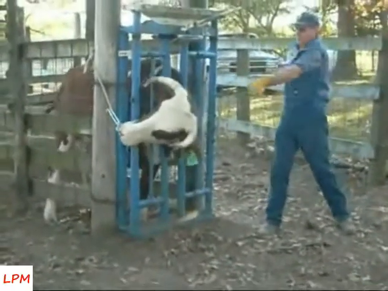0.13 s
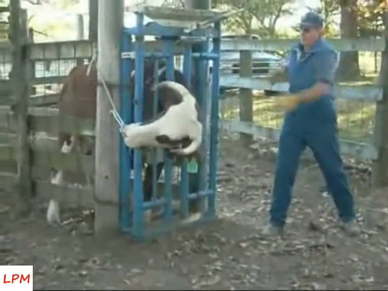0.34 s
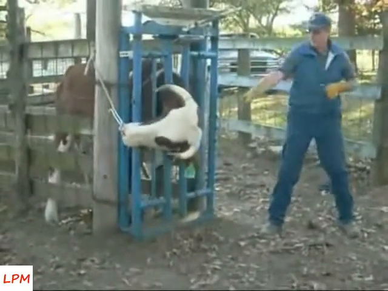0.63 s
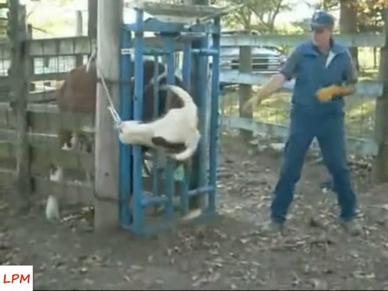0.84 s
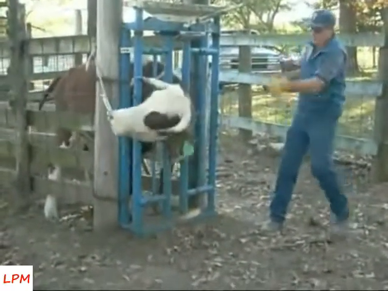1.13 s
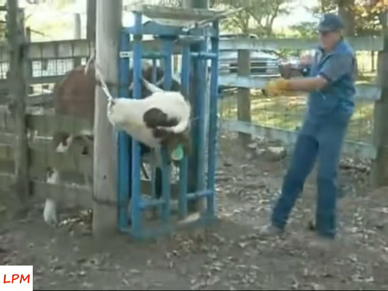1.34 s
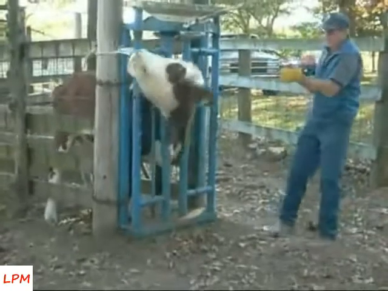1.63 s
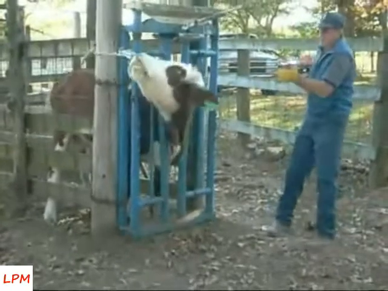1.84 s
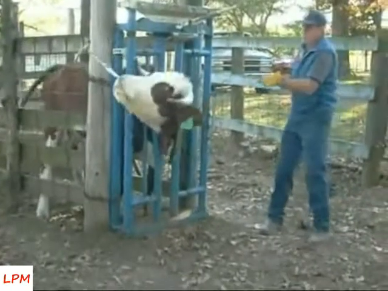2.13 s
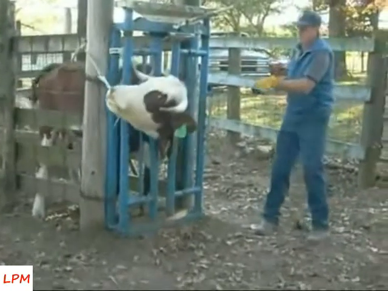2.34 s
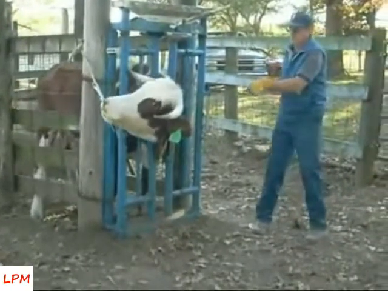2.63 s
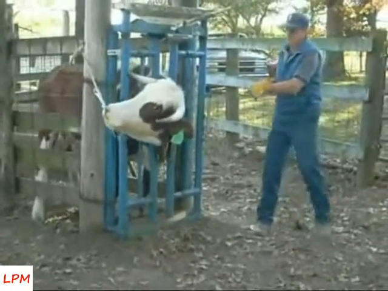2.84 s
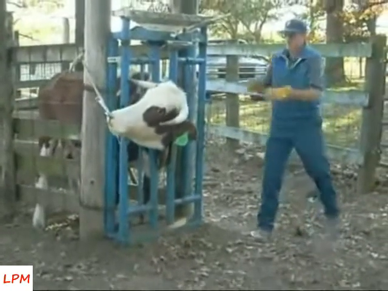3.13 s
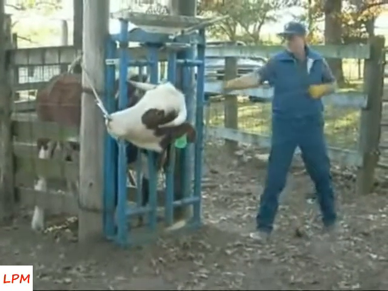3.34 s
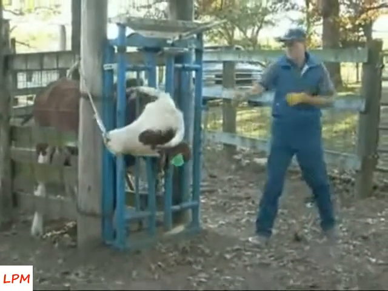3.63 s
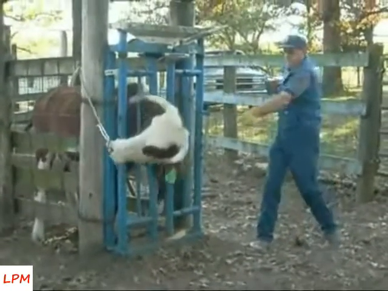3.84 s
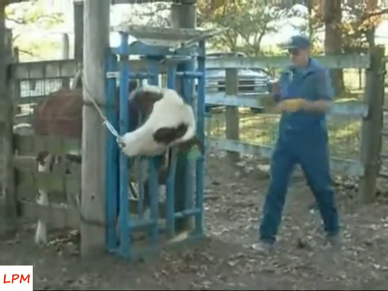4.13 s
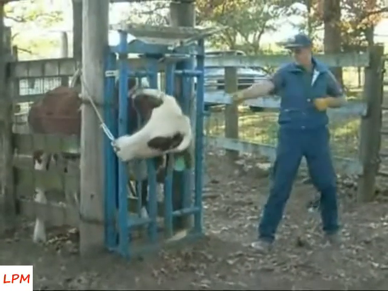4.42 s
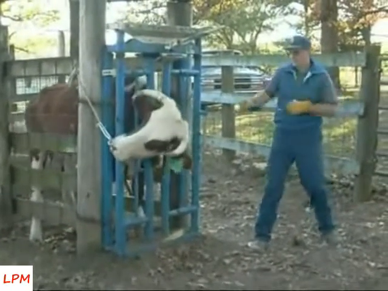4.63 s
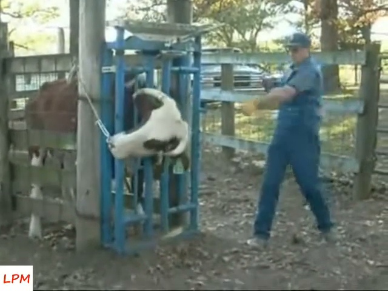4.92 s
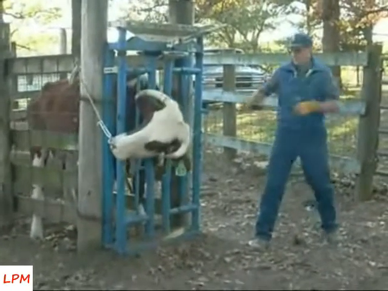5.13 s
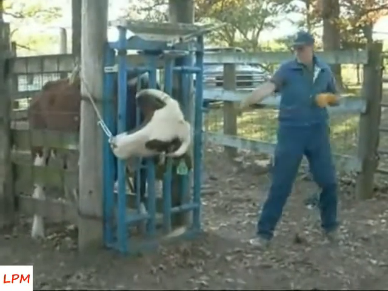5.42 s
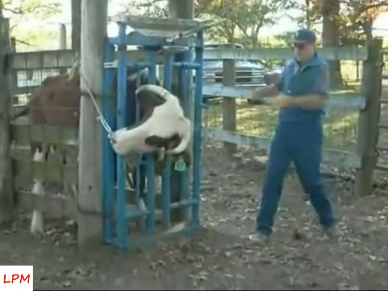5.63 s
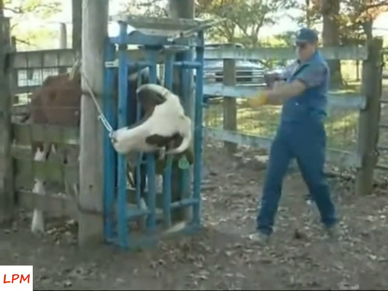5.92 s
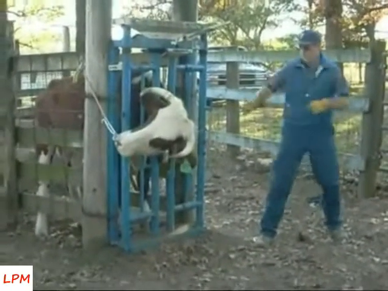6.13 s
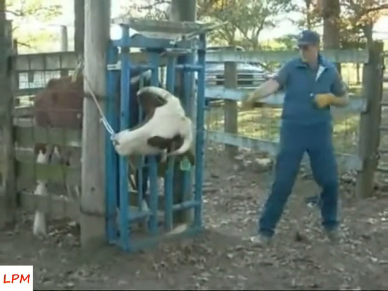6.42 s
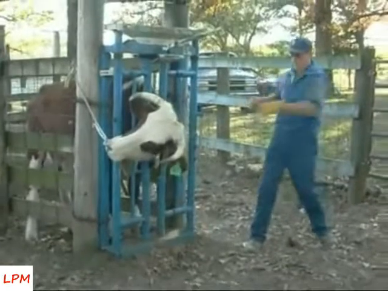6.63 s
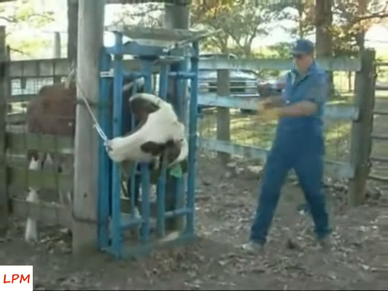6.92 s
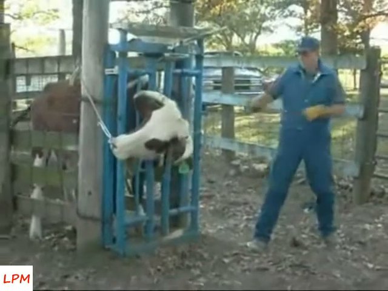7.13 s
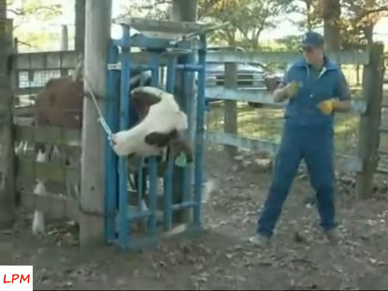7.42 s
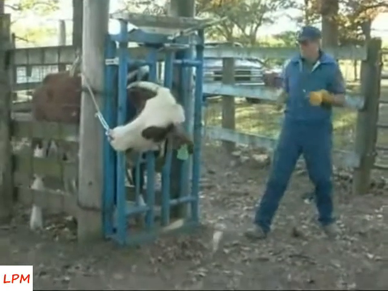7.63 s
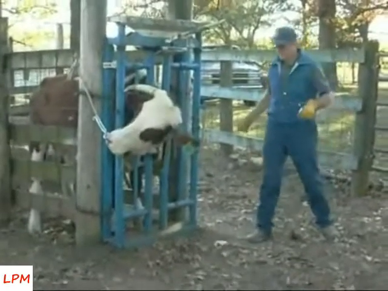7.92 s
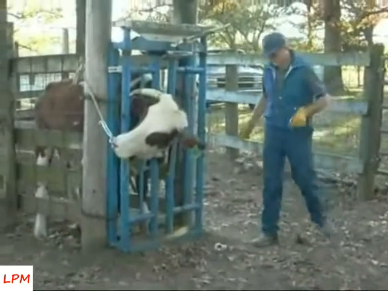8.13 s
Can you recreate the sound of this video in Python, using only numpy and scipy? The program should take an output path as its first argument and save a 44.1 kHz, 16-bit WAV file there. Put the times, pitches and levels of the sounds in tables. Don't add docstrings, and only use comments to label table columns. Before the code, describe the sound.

A tied calf breathes in short, hoarse puffs and scuffs dry dirt and leaves. Around one second a metal gate cracks and slams twice with hard bouncing pings, then a looser rattle follows at two seconds, leaving a faint pipe tone. Near four seconds a chain jingles, the hinge squeaks and a hoof stamps. Panting continues quietly outdoors, with a small, bright, slightly overloaded microphone.

```python
import sys
import numpy as np
from scipy import signal
from scipy.fft import rfft, irfft, next_fast_len
from scipy.io import wavfile
from scipy.ndimage import uniform_filter1d, map_coordinates

SR = 44100
rng = np.random.default_rng(int(sys.argv[2]) if len(sys.argv) > 2 else 0)


def magnitude_from_level(level_db):
    exponent = np.asarray(level_db, float) / 20
    return 10 ** exponent


def dump(signal):
    limited = np.clip(np.atleast_2d(signal).T, -1, 1)
    pcm = np.round(limited * 32767).astype(np.int16)
    wavfile.write(sys.argv[1], SR, pcm)


N = 364707
TIME = np.arange(N) / SR
STRUCK_TIME = np.arange(SR // 4) / SR


def unit(x):
    return x / np.sqrt(np.mean(x ** 2) + 1e-20)


def along(points, hz):
    f, v = np.transpose(points)
    return np.interp(np.log(hz + 1), np.log(f + 1), v)


def wobble(rate):
    return map_coordinates(rng.standard_normal(int(N * rate / SR) + 4), [TIME * rate])


def filtered(x, response):
    m = next_fast_len(N + SR // 2)
    return irfft(rfft(x, m) * response(np.fft.rfftfreq(m, 1 / SR)), m)[..., :N]


def resonance(f, hz, width):
    return 1j * f * width / (hz * hz - f * f + 1j * f * width)


def presence(f):
    return magnitude_from_level(-21) - 2.05 * resonance(f, 2970, 590) * resonance(f, 3260, 450)


def noise(response, patchy_db=0.):
    white = rng.standard_normal(N)
    if patchy_db:
        z = signal.stft(white, nperseg=512)[2]
        field = uniform_filter1d(rng.standard_normal(z.shape), size=2, axis=0)
        field = uniform_filter1d(field, size=9, axis=1)
        white = signal.istft(z * magnitude_from_level(patchy_db * unit(field)), nperseg=512)[1][:N]
    return unit(filtered(white, response))


def coloured(spectrum, patchy_db=0.):
    return noise(lambda f: magnitude_from_level(along(spectrum, f)), patchy_db)


def gritty(patchy_db=0.):
    return noise(lambda f: presence(f) * magnitude_from_level(along(GRIT, f)), patchy_db)


def swells(start, held, db, rise, fall, growth_db=0):
    start, held, db = (np.asarray(v)[:, None] for v in (start, held, db))
    since = TIME[::64] - start
    before = rise * np.maximum(-since, 0)
    after = fall * np.maximum(since - held, 0)
    each = db - before - after - growth_db * np.clip(1 - since / held, 0, 1)
    return np.interp(TIME, TIME[::64], each.max(axis=0))


def fade(t60, rise):
    return magnitude_from_level(-60 * STRUCK_TIME / np.clip(t60, .02, .3)) * (1 - np.exp(-STRUCK_TIME / rise))


def small_body(x):
    return filtered(x, lambda f: f ** 2 / (f ** 2 + 110 ** 2))


# frequency_hz, density_db (per Hz)
SIZZLE = [(3000, -18), (4500, 1.5), (6500, -7), (8500, -12.5), (11000, -20.5)]
THUD = [(60, -47.5), (130, -15.5), (190, 6.5), (330, 1), (600, -47.5)]
# frequency_hz, level_db
BARS = [(2584, -15), (2860, -4), (3025, -4.5), (3200, -10.5), (3305, 18), (3607, -21), (4150, -4.5),
        (4550, -12)]
# frequency_hz, level_db, t60_s
FRAME = [(505.4, -2.5, 0.18), (577, -8, 1), (728, 11.5, 0.24), (764, -21, .3), (965, 0, 0.64),
         (1100, 9.5, 0.35), (1470, -10, .4), (2100, 1, 0.55)]
# start_s, level_db, pitch_hz
LATCH = [
    (0.8519, -9.5, 2650),
    (0.8616, -16.5, 2573),
]
SLAMS = [
    (0.9805, 0, 3140),
    (0.9857, 0.5, 2990),
    (0.9934, -7, 2960),
    (1.0062, -25.5, 3270),
    (1.0156, -33, 3170),
    (1.164, 4, 3056),
    (1.1737, -2.5, 2980),
    (1.1845, -10.5, 3000),
    (1.1936, -31, 3070),
]
RATTLE = [
    (2.0382, -11, 3394),
    (2.0624, -11, 3314),
    (2.0912, -13, 3330),
    (2.1034, -19.5, 3160),
    (2.1157, -15, 3214),
    (2.1552, -15.5, 3170),
    (2.1996, -21, 3355),
    (2.2394, -34, 3380),
    (2.2744, -43, 3280),
    (2.3292, -41, 3110),
]
# knock_db, sizzle_db, t60_s
STEELS = [
    (-54, -28, 0.076),
    (-25.5, -31.5, 0.043),
    (-23, -19, 0.062),
]


def clanks():
    duller, dullest_db, darker, longer_s = 0.76, -7, .4, 0.0018
    out, t = np.zeros(N), STRUCK_TIME
    clang, knock, thud, sizzle = gritty(), coloured(DRAG), coloured(THUD), coloured(SIZZLE)
    crack = noise(lambda f: f > 5000)
    bar_hz, bar_db = np.transpose(BARS)[:, :, None]
    frame_hz, frame_db, frame_t60 = np.transpose(FRAME)[:, :, None]
    for bounces, (full_db, bright_db, full_t60) in zip((LATCH, SLAMS, RATTLE), STEELS):
        for s, db, hz in bounces:
            knock_db = min(full_db - duller * db, dullest_db)
            sizzle_db = bright_db + darker * db
            t60 = full_t60 - longer_s * db
            at = slice(round(s * SR), round(s * SR) + len(t))
            chance = rng.standard_normal((4, len(FRAME), 1))
            ping = fade(t60, 0.0014) * np.sin(2 * np.pi * hz * t)
            bars = magnitude_from_level(bar_db + 4 * chance[0]) * np.sin(2 * np.pi * bar_hz * t + 9 * chance[1])
            frame = magnitude_from_level(frame_db + 4 * chance[2] - 60 * t / frame_t60)
            frame = frame * np.sin(2 * np.pi * frame_hz * t + 9 * chance[3])
            rattle = magnitude_from_level(knock_db - 30.5) * thud[at] + magnitude_from_level(knock_db - 8.5) * knock[at]
            rattle += magnitude_from_level(knock_db / 2 - 5) * clang[at] + magnitude_from_level(sizzle_db - 8.5) * sizzle[at]
            rattle += magnitude_from_level(-33.0) * bars.sum(0)
            blow = magnitude_from_level(-6.0) * ping
            blow += magnitude_from_level(sizzle_db - 11.5) * fade(0.0067, 0.00023) * crack[at]
            blow += fade(2.24 * t60, 0.00014) * rattle
            blow += magnitude_from_level(knock_db - 30.5) * fade(1, .004) ** 0.047 * frame.sum(0)
            out[at] += magnitude_from_level(db) * blow
    return small_body(out)


# start_s, level_db, t60_s
CRACKS = [
    (0.823, -6.5, 0.11),
    (0.8327, -5.5, 0.094),
    (0.8418, -10.5, 0.072),
    (1.533, -27, .06),
    (6.2423, -31.5, 0.11),
]
CHINKS = [
    (.9103, -27, 0.14),
    (0.9214, -30, .24),
    (3.9329, -17.5, 0.11),
    (4.189, -35, 0.11),
    (4.2608, -40, .11),
    (4.329, -29, .1),
    (7.9767, -31.5, 0.071),
]
JINGLES = [
    (3.8979, -23, 0.098),
    (3.91, -21.5, 0.34),
    (3.952, -25.5, 0.38),
    (3.986, -27, 0.25),
    (4.411, -22.5, 0.13),
]
TAPS = [(0.1332, -30, 0.34), (0.5391, -37.5, 0.071), (1.341, -30.5, 0.41), (1.7398, -28, 0.11),
        (1.782, -30.5, 0.11), (2.61, -40.5, 0.12), (3.65, -50.5, .13), (3.7204, -51, .075),
        (5.1058, -35, 0.14), (7.7695, -47, 0.074), (8.004, -43, 0.069)]
STAMPS = [
    (2.9017, -43.5, 0.069),
    (4.0419, -11.5, 0.11),
    (4.0508, -14.5, 0.064),
    (4.0654, -23.5, 0.16),
    (4.0836, -25, 0.18),
    (4.0991, -25.5, 0.18),
    (7.9478, -44, 0.11),
]
KICKS = [
    (6.418, -52, 0.06),
    (7.7346, -26, .03),
]
# knock_db, thud_db, sizzle_db
COLOURS = [
    (-47.5, -62, -24),
    (-22, -39.5, -11),
    (-16.5, -33.5, -26.5),
    (-9.5, -31, -35),
    (-13, -17.5, -29),
    (-2, -8, -33),
]


def knocks():
    out, t = np.zeros(N), STRUCK_TIME
    clang, knock, thud, sizzle = gritty(), coloured(DRAG), coloured(THUD), coloured(SIZZLE)
    tick = np.sin(2 * np.pi * 3150 * t)
    hollow = sum(np.sin(2 * np.pi * hz * t) for hz in (600, 900, 1850))
    kinds = (CRACKS, CHINKS, JINGLES, TAPS, STAMPS, KICKS)
    for blows, (knock_db, thud_db, sizzle_db) in zip(kinds, COLOURS):
        for s, db, t60 in blows:
            at = slice(round(s * SR), round(s * SR) + len(t))
            burst = magnitude_from_level(knock_db / 4 - 4) * clang[at] + magnitude_from_level(sizzle_db - 7) * sizzle[at]
            burst += magnitude_from_level(knock_db) * knock[at]
            edge = magnitude_from_level(-4) * tick + magnitude_from_level(knock_db - 2.0) * hollow
            blow = fade(t60, 0.0012) * burst + fade(0.015, 0.00025) * edge
            blow += magnitude_from_level(thud_db + 1) * fade(t60, 0.0015) * thud[at]
            out[at] += magnitude_from_level(db) * blow
    return small_body(out)


# start_s, length_s, breath_db, first_resonance_db, second_resonance_db
BREATHS = [(0.029, 0.18, -44.5, -48, -52.5), (0.518, 0.2, -41.5, -59.5, -58), (1.299, 0.11, -50, -52, -58),
           (1.642, 0.19, -57, -47.5, -63), (3.272, .2, -48.5, -52.5, -54.5),
           (3.742, .15, -41.5, -49, -51.5), (4.252, 0.22, -42.5, -49, -54),
           (4.718, 0.2, -44.5, -49.5, -49.5), (5.142, .26, -47, -54.5, -58.5),
           (5.678, 0.19, -47, -55, -56.5), (6.101, 0.21, -49, -60, -64), (6.598, 0.23, -54.5, -60, -60.5),
           (7.118, .12, -54, -59.5, -64.5), (7.4, .12, -67, -63, -70)]
# frequency_hz, width_hz, level_db
THROAT = [(543, 280, -6.5), (1780, 780, -2), (3560, 1700, -19.5), (4260, 1400, -21)]


def moving_resonance(hz, width):
    carrier = np.sqrt(2) * np.sin(2 * np.pi * np.cumsum(hz) / SR)
    return noise(lambda f: 1 / (1 + 1j * f / width) ** 2) * carrier


def throat_response(f):
    modes = sum((-1) ** k * magnitude_from_level(db) * resonance(f, hz, w) for k, (hz, w, db) in enumerate(THROAT))
    return presence(f) * modes


def panting():
    start, length, breath_db, throat_db, tongue_db = np.transpose(BREATHS)
    rise, throat_rise, fall = 330, 130, 303
    level_db = swells(start, length, breath_db, rise, fall, growth_db=5)
    first_db = swells(start, length, throat_db, throat_rise, fall, growth_db=10)
    second_db = swells(start, length, tongue_db, rise, fall, growth_db=6.5)
    knots = np.ravel([start - .09, start + length, start + length + .05], "F")
    opened = np.interp(TIME, knots, np.tile([0, 1, 1], len(start)))
    shut_hz, open_hz = 520, 960
    first_hz = shut_hz + (open_hz - shut_hz) * opened ** .5
    upper = noise(throat_response, patchy_db=2.0)
    first = moving_resonance(first_hz + 35 * wobble(14), 62)
    second = moving_resonance(1200 + first_hz / 2 + 65 * wobble(11), 110)
    third = moving_resonance(2560 + 50 * wobble(4), 80)
    narrow_db = np.minimum((850 - first_hz) / 25, 5)
    voiced = magnitude_from_level(first_db - 3.5) * first + magnitude_from_level(second_db + 3.1 * wobble(22)) * second
    voiced += magnitude_from_level(level_db - 9.0 + narrow_db) * third
    return magnitude_from_level(0.56 * wobble(31)) * (magnitude_from_level(level_db - 4.0) * upper + voiced)


# start_s (when full), held_s, level_db, leaves_db (re scuff)
HEAVES = [(.04, .15, -41.5, -40), (.37, .08, -52, -12), (.54, .04, -44, -25), (.63, 0.071, -39.5, -38),
          (1.25, 0.18, -41.5, -8), (1.48, .06, -42, -6.5), (1.58, 0.21, -34.5, -7.5),
          (1.84, 0.059, -38, -8), (1.97, .08, -40.5, -9.5), (2.4, 0.14, -55, -9), (2.6, .5, -58, -11.5),
          (3.34, 0.081, -40.5, -11), (3.801, 0.094, -42, -3.5), (4.15, 0.23, -39.5, -17),
          (4.419, 0.01, -42, -34), (4.76, 0.076, -45, -6), (4.88, 0.01, -45.5, -4),
          (5.241, .12, -44, -12.5), (5.72, 0.13, -48, -5.5), (6.14, 0.16, -51, -3.5),
          (6.36, 0.23, -50.5, -2.5), (6.57, .72, -48, -2.5), (7.33, 0.13, -50.5, -4),
          (7.74, 0.34, -50, -18), (8.08, .3, -51.5, -19)]
# frequency_hz, density_db (per Hz)
GRIT = [(1200, -35.5), (2000, 5.5), (3000, 1.5), (4500, -1), (7000, -17.5), (11000, -42.5)]
FIZZ = [(2800, -26), (3600, 3.5), (5000, -10), (7000, -21), (11000, -33.5)]


def scuffing():
    start, held, db, leaves_db = np.transpose(HEAVES)
    rise, fall = 107, 152
    grit = unit(magnitude_from_level(1.1 * wobble(150)) * gritty(patchy_db=2.6))
    rasp = lambda f: magnitude_from_level(along(FIZZ, f)) + magnitude_from_level(8) * resonance(f, 3240, 210) ** 2
    leaves = noise(rasp, patchy_db=2.2)
    scuffs = magnitude_from_level(swells(start, held, db, rise, fall)) * grit
    scuffs += magnitude_from_level(swells(start, held, db + leaves_db, rise, fall)) * leaves
    return magnitude_from_level(-3.5) * scuffs


# start_s (when full), held_s, level_db
DRAGS = [(0, 0.79, -62.5), (.9, 0.071, -53), (1.03, 0.043, -51.5), (1.19, 0.094, -45), (1.6, 0.26, -50.5),
         (2.23, 0.037, -48.5), (2.7, 0.72, -65.5), (3.739, .1, -59.5), (3.911, 0.24, -49.5),
         (4.3, 0.066, -54), (4.8, .5, -70.5), (6.1, 0.99, -67.5), (7.25, 0.083, -59.5), (7.8, 0.55, -73)]
# frequency_hz, density_db (per Hz)
DRAG = [(250, -40.5), (450, 1.5), (700, -1), (1500, 0.5), (2400, -7), (4000, -42.5)]


def dragging():
    rub_db = swells(*np.transpose(DRAGS), rise=200, fall=40.4)
    return magnitude_from_level(rub_db - 0.5) * coloured(DRAG, patchy_db=4)


def tone_swells(rows):
    out, t = np.zeros(N), np.arange(-SR // 16, SR // 16) / SR
    for s, hz, db, length in rows:
        turn = 2 * np.pi * (hz * t + rng.random())
        octave = magnitude_from_level(-28.5) * (2000 < hz < 4000) * np.sin(2 * turn)
        begin = round((s + t[0]) * SR)
        out[begin:begin + len(t)] += magnitude_from_level(db) * np.exp(-(t / length) ** 2) * (np.sin(turn) + octave)
    return out


# centre_s, level_db
SLIPS = [(0.82, -18.5), (0.8241, -5.5), (0.833, -10), (0.8457, -7.5), (3.902, -27), (3.91, -8.5),
         (3.918, -10.5), (3.921, -4), (3.925, -10.5), (3.936, -15), (3.941, -21), (3.955, -16.5),
         (3.956, -19), (3.967, -22), (3.978, -24), (3.992, -15.5), (4.005, -18.5), (4.016, -24)]
# centre_s, pitch_hz, level_db, length_s
SQUEAKS = [
    (1.107, 4820, -32.5, 0.011),
    (1.135, 4950, -49, 0.012),
    (2.393, 4800, -60, .012),
    (3, 4220, -75, 0.0068),
]


def hinge():
    slips = []
    for s, db in SLIPS:
        hz = 3048 + 40 * rng.standard_normal()
        slips.append((s, hz, db, .0015 - .00011 * db))
    return tone_swells(slips + SQUEAKS)


# centre_s, pitch_hz, level_db, length_s
BONGS = [(.655, 450, -53, 0.017), (.782, 189, -57.5, 0.0051), (1.58, 192, -57, 0.0086),
         (2.06, 181, -46.5, 0.01), (2.2, 185, -52, 0.016), (2.78, 55, -65, .02),
         (3.908, 652, -30.5, 0.0095), (3.92, 170, -48, .015), (4.05, 198, -27, .011),
         (4.088, 191, -31, .013), (7.985, 211, -49.5, 0.0049)]


def bongs():
    return tone_swells(BONGS)


# start_s, level_db
STRIKES = [
    (1.2, -56),
    (2.07, -47.5),
]


def pipe():
    pitch_hz, fade_rate, early_db, early_s = 621, 11.7, 14, 0.073
    lean_s, lean_rate = 3.8, 45
    ring = np.zeros(N)
    for s, db in STRIKES:
        since = TIME - s
        level_db = db - fade_rate * since + early_db * np.exp(-np.abs(since) / early_s)
        ring += (since > 0) * magnitude_from_level(level_db)
    ring = uniform_filter1d(ring * magnitude_from_level(-lean_rate * np.maximum(TIME - lean_s, 0)), size=2000)
    return np.sqrt(2) * ring * np.sin(2 * np.pi * pitch_hz * TIME)


# frequency_hz, t60_s
YARD = [(200, 1), (700, 0.93), (3000, 0.38), (6000, 0.44), (11000, 0.47)]


def yard(x):
    hz, t, z = signal.stft(rng.standard_normal(SR), SR, nperseg=256)
    tail = signal.istft(z * magnitude_from_level(-60 * t / along(YARD, hz)[:, None]), SR, nperseg=256)[1]
    return signal.fftconvolve(x, tail / np.linalg.norm(tail))[:N]


# time_s, level_db
IDLE = [
    (0.0, -75),
    (2.26, -89.5),
    (3.66, -82),
    (4.05, -64),
    (4.58, -80),
    (5.32, -63.5),
    (6.54, -66.5),
    (7.62, -65.5),
    (8.27, -70.5),
]
# frequency_hz, level_db
ORDERS_HZ = [(68, -4), (103, 1), (137, -7.5)]


def engine():
    level_db = np.interp(TIME, *np.transpose(IDLE))
    drift = 0.41 * wobble(2.3)
    orders = sum(magnitude_from_level(db + 1.5 * wobble(12)) * np.sin(2 * np.pi * hz * TIME + drift) for hz, db in ORDERS_HZ)
    return magnitude_from_level(level_db - 9.5) * orders


# frequency_hz, density_db (per Hz)
HISS = [(15, -26.5), (25, -9.5), (112, -4.5), (241, -11.5), (635, -6.5), (759, -11.5), (1510, -10),
        (2390, -10.5), (3080, 4), (4290, -20.5), (5970, -20), (10200, -22), (11000, -23), (14300, -60),
        (22000, -120)]


def hiss():
    return magnitude_from_level(-62.5) * coloured(HISS)


def scene():
    steel, dull, slips = clanks(), knocks(), hinge()
    echoes = yard(magnitude_from_level(-9.0) * steel + magnitude_from_level(-11.0) * slips + magnitude_from_level(-17) * dull)
    gate = steel + slips + dull + echoes + bongs() + pipe()
    calf = panting() + scuffing() + dragging()
    return (gate + calf + engine() + hiss())[None]


def band_limit(x):
    return signal.sosfilt(signal.butter(12, 11290, fs=SR, output="sos"), x)


def record(dry):
    bend = filtered(dry ** 2, lambda f: f ** 2 / (f ** 2 + 900 ** 2))
    loud = dry + 0.046 * bend
    rounded = loud / (1 + np.abs(loud / 1.03) ** 4) ** (1 / 4)
    top_hz = 10600
    band = filtered(rounded, lambda f: magnitude_from_level(np.clip((top_hz - f) * 0.063, -42, 0)))
    return band_limit(band)


dry = scene()
out = record(dry)
dump(out)
```